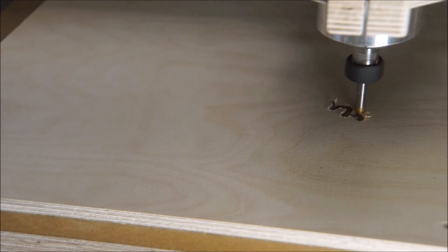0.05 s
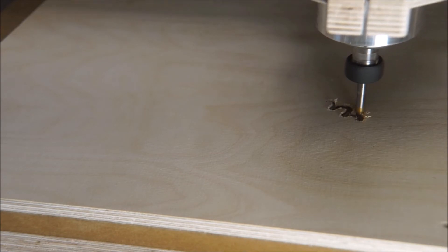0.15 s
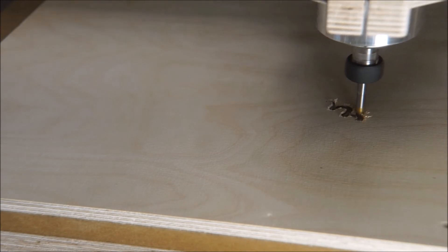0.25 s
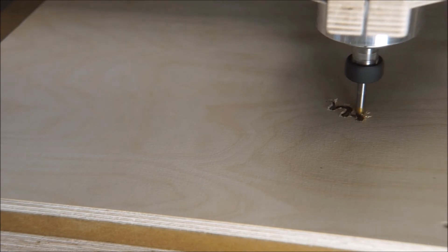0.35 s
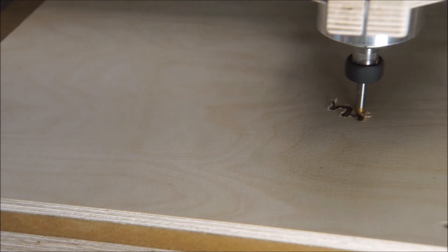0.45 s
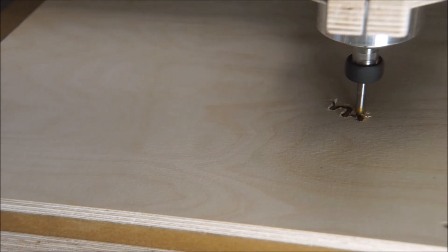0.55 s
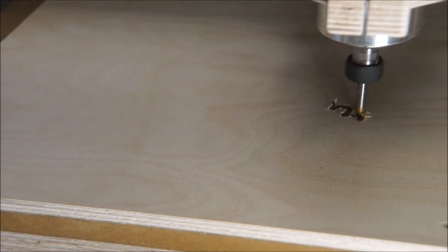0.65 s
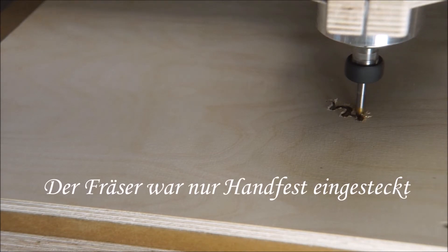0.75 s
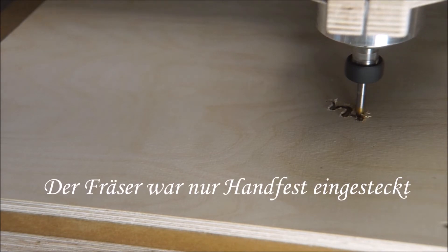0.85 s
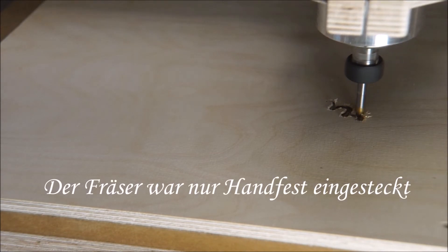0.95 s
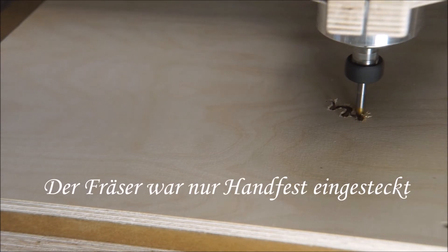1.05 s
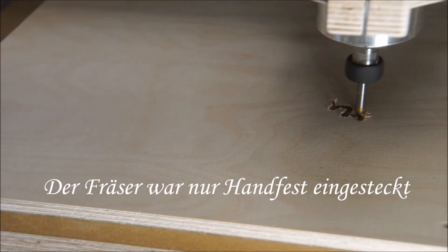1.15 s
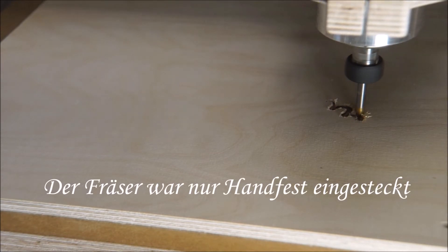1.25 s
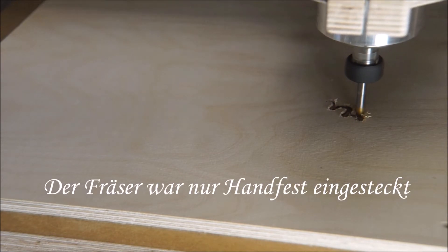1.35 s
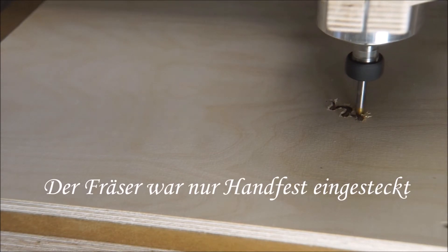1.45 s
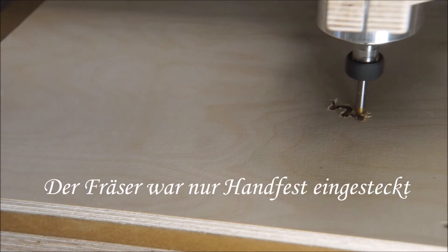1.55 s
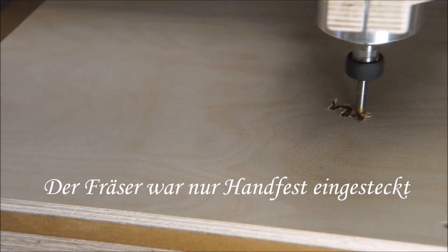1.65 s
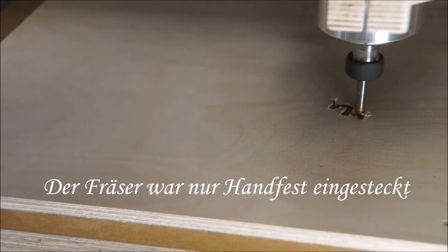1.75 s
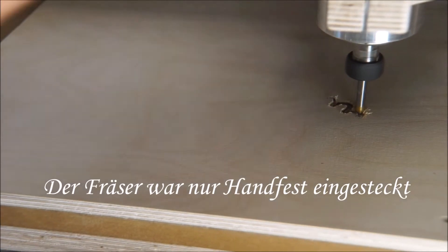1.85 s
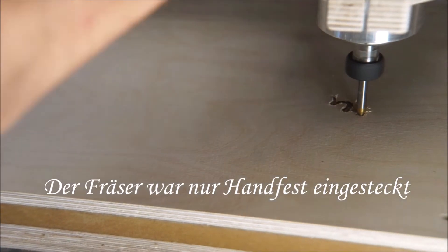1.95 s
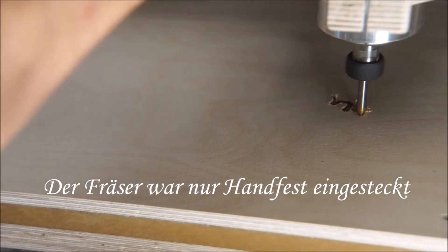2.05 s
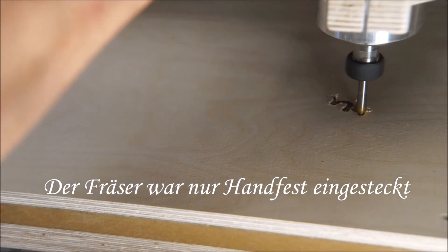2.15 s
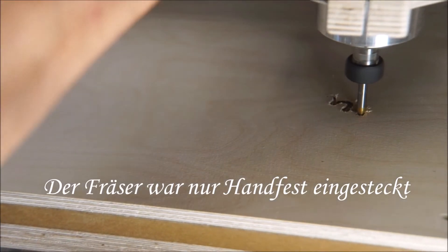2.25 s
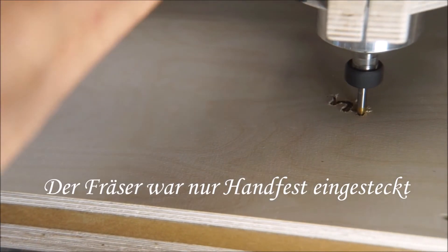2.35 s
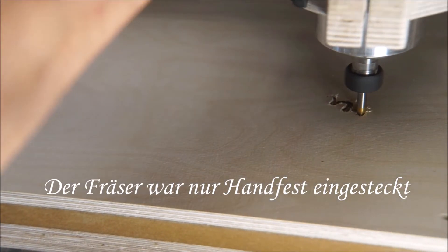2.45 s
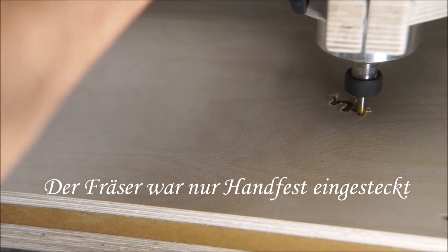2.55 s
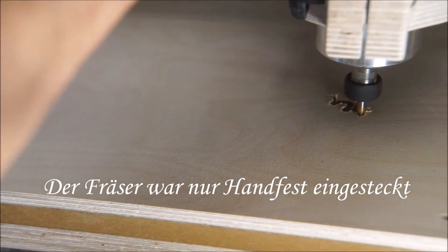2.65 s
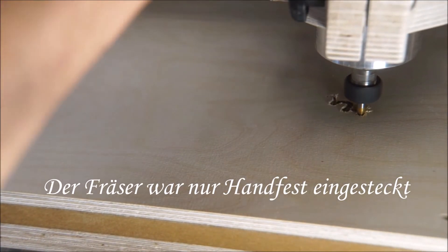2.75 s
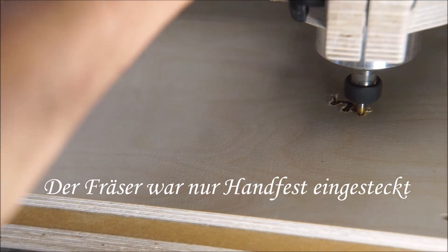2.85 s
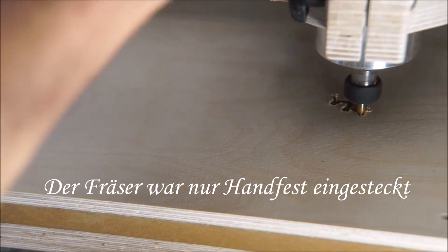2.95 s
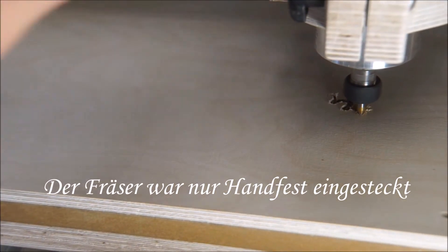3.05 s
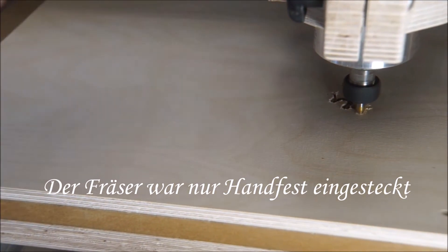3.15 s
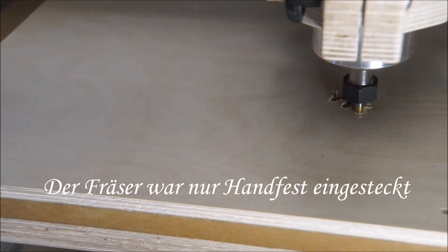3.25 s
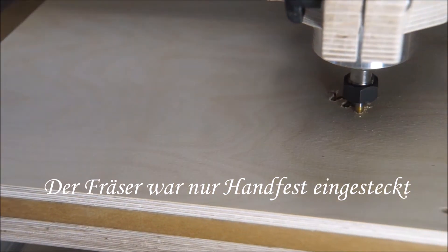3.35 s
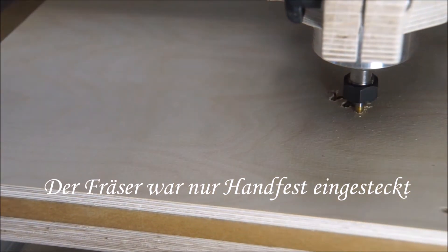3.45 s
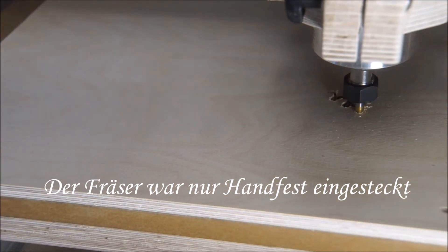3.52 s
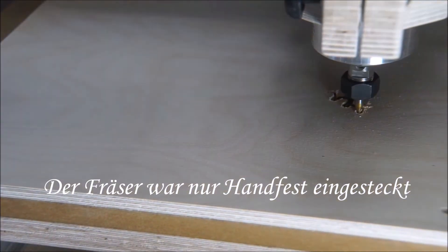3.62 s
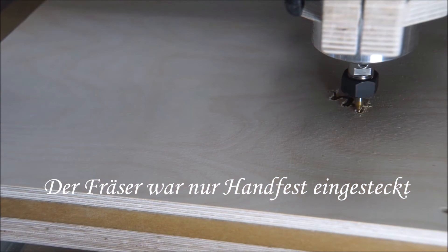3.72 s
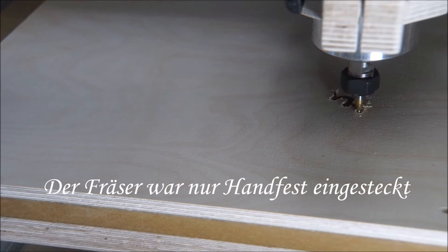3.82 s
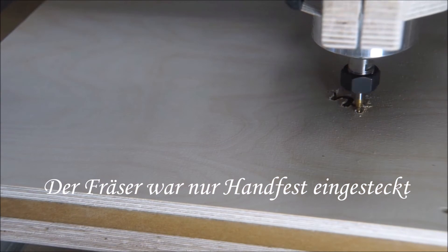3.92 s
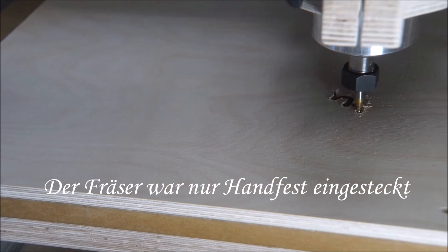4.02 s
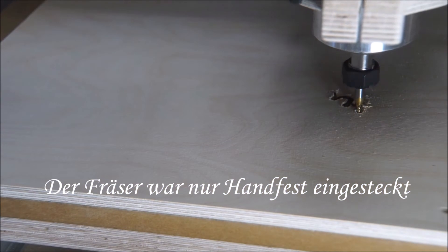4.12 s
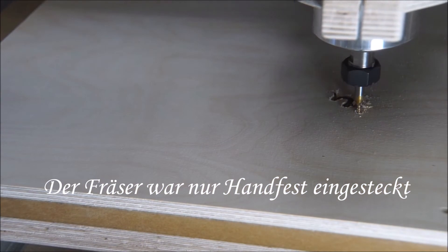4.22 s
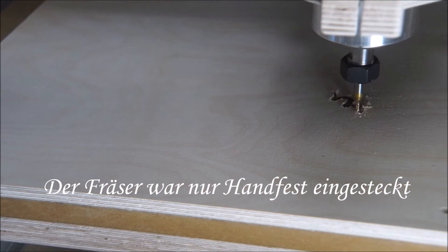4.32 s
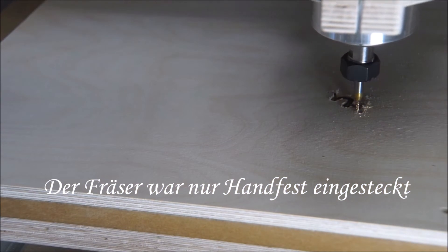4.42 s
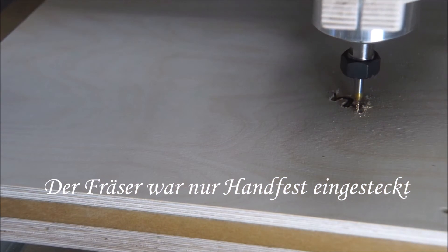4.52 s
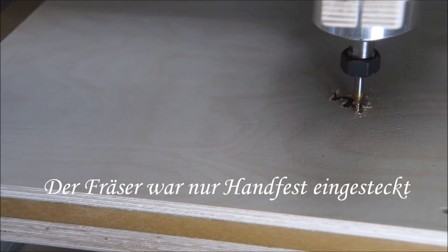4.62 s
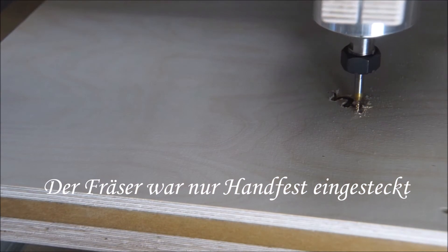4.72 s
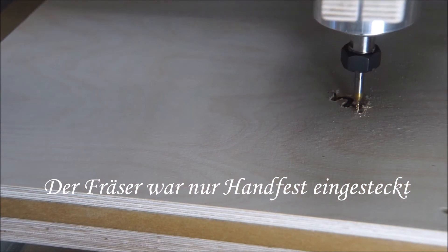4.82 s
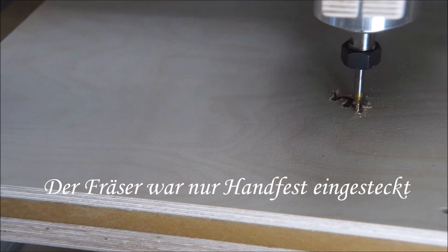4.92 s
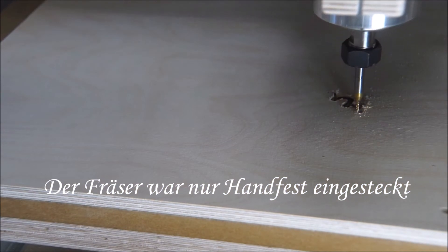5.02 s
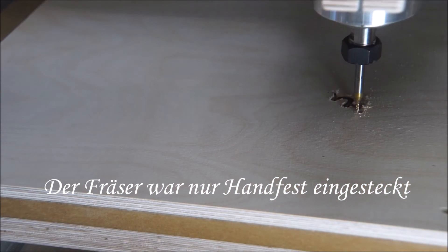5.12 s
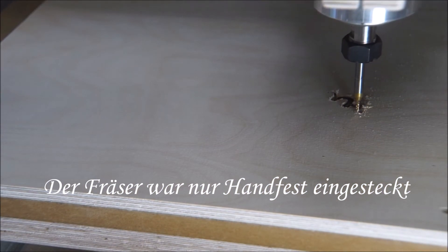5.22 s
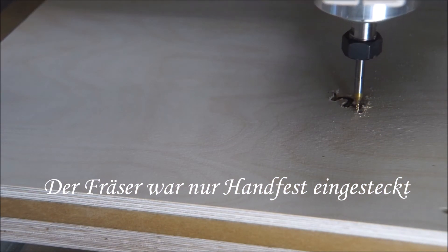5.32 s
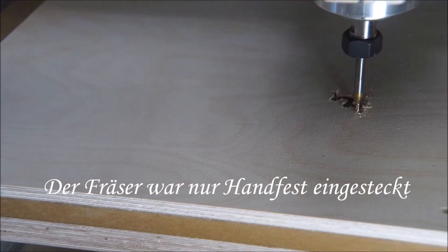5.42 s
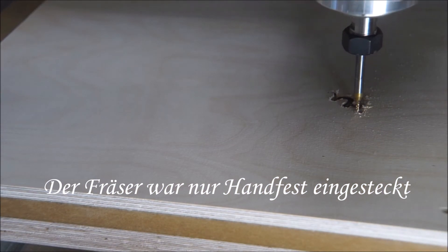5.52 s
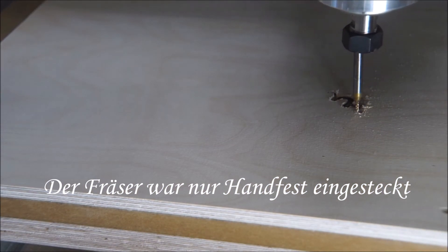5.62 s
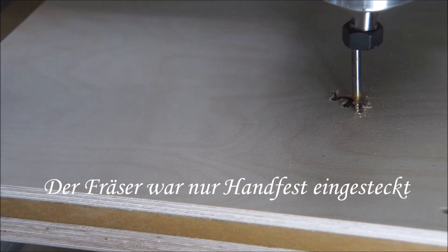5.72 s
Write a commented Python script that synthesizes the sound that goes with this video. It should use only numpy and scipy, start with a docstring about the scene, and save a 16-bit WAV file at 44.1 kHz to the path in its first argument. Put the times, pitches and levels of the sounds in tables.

```python
"""CNC router with a loose bit.

The bit squeals, chatters and rattles in the collet over the spindle's whine. The spindle coasts down,
is driven into a wooden board and stalls; the wood creaks and crunches under the push. A stepper motor
then lifts the head with a steady buzz, and the bit slips out of the collet."""
import sys
import numpy as np
from scipy import signal
from scipy.fft import rfft, irfft, next_fast_len
from scipy.io import wavfile

SR = 44100
rng = np.random.default_rng(int(sys.argv[2]) if len(sys.argv) > 2 else 0)


def waveform_to_disk(signal):
    """Save audio, clipped to [-1, 1], as 16-bit WAV at the path in sys.argv[1]."""
    frames = np.transpose(np.atleast_2d(signal))
    scaled = np.clip(frames, -1, 1) * 32767
    samples = np.round(scaled).astype(np.int16)
    wavfile.write(sys.argv[1], SR, samples)


N = 254445
T = np.arange(N) / SR

# pitches at which the falling whine swells, with dips between them: freq_hz, width_hz, gain_db
WHINE_PEAKS = [(948.3, 51.4, -27), (839.5, 30, -30.5), (753, 24, -40), (652, 58, -47), (552, 29, -39.5),
               (433, 78, -35.5)]
# whine overtones: whine_multiple, gain_db
WHINE_OVERTONES = [(2, 0), (3, -10), (4, -12), (5, -13), (8, -14.5), (12, -11.5)]
# partials of the bit binding in wood: whine_multiple, gain_db
GRIND_PARTIALS = [(2, -15), (3, -13), (4, -6), (5, -11), (6, -14), (7, -17), (8, -7.5), (9, -20), (10, -13),
                  (11, -16), (12, -9), (13, -15), (16, -12)]
# resonances of the bit pressed into the board: freq_hz, width_hz, gain_db
JAM_MODES = [(1562, 140, 9.5), (3240, 310, -5), (5530, 370, 6)]
# clean whirl partials: whirl_multiple, added_whine_multiple, gain_db
SQUEAL_PARTIALS = [(1, 0, -3), (1, 1, -4.5), (2, 0, 1), (3, 0, -7), (3, 1, -6.5), (4, 0, -2), (5, 0, -9.5),
                   (5, 1, -25), (6, 1, -16), (7, 0, -18)]
# steel-on-steel blow spectrum: freq_hz, gain_db
BLOW_SPECTRUM = [(150, -52.5), (300, -33), (480, -32), (560, -22), (700, -25.5), (900, -10), (1180, -13.5),
                 (1500, -8.5), (1800, -6), (2400, -2.5), (3000, -3), (3800, -7.5), (4600, -10), (6200, -8),
                 (7500, -23.5)]
# collet and spindle mount resonances: freq_hz, width_hz, gain_db
COLLET_MODES = [(1480, 27, 1.5), (2340, 84, -12), (2782, 46, 4), (2903, 45, 1.5), (3162, 27, 7),
                (3590, 29, -0.5), (5070, 180, -14), (6400, 180, -15)]
# scraping hiss spectrum: freq_hz, gain_db
HISS_SPECTRUM = [(4120, -7.5), (7000, -3), (7620, -4.5), (9200, -4), (9650, -7), (11700, -4), (15100, -11),
                 (15700, -11)]
# spells where the bit seats differently: start_s, end_s, blows_change_db, hiss_change_db
SEATINGS = [(0, 0.734, -3.5, 1), (1.245, 1.33, -2, -1), (1.345, 1.625, 1.1, 1.1), (1.658, 1.674, 3, 2),
            (1.68, 1.749, -4, -3), (1.757, 1.775, 2, -.5), (1.87, 2.043, -1.5, -0.1),
            (2.96, 3.02, -1.5, -3)]
# frame rumble spectrum: freq_hz, gain_db
SHUDDER_SPECTRUM = [(25, 3), (60, -4), (150, -0.5), (300, -7), (600, -22), (3000, -32)]
# course of the ragged whirl: time_s, pitch_hz, brightness_db_per_octave
CHATTER_COURSE = [(.27, 1015, -4.5), (.52, 1021, -0.5), (.76, 1013, -3.5), (1.13, 1051, -4.5),
                  (1.23, 967, -9), (1.36, 1005, -3), (1.49, 985, 1.5), (1.6, 926.5, -3), (1.68, 927, -10)]
# ragged whirl partials: whirl_multiple, gain_db
CHATTER_PARTIALS = [(2, -3), (3, 0), (4, -12), (5, -0.5), (6, -0.5), (7, -8), (8, -12), (9, -10)]
# bouts of ragged whirl: start_s, end_s, gain_db
BOUTS = [(.262, 1.24, -32.5), (1.34, 1.68, -36.5)]
# stick-slip creaks: start_s, length_s, pitch_hz, width_hz, level_db
SLIPS = [(3.145, .105, 1490, 30, -35), (3.185, .022, 920, 60, -32), (3.16, .07, 620, 160, -43),
         (3.29, .042, 1490, 40, -41), (3.312, .06, 960, 45, -34.5), (3.365, .06, 1010, 40, -43),
         (3.345, .07, 400, 40, -49), (3.43, .08, 565, 50, -45), (3.3, .13, 5850, 160, -56),
         (3.525, .03, 5840, 60, -50), (3.588, .025, 5800, 60, -57)]
# snapping fibre spectrum: freq_hz, gain_db
FIBRE_SPECTRUM = [(150, -57), (270, -18.5), (400, -18.5), (700, -4.5), (1200, -7.5), (2000, -7.5),
                  (2800, -7), (3400, -15), (5900, -20), (7600, -25.5), (14000, -35.5)]
# pushes of the bit into the board: start_s, end_s, level_db
BIT_PUSHES = [(3.24, 3.285, -50.5), (3.287, 3.399, -38.5), (3.415, 3.515, -39), (3.515, 3.643, -47.5),
              (3.648, 3.668, -47)]
# bit and frame knocks: start_s, level_db, centre_hz, width_hz, decay_s
CONTACTS = [(3.289, -45, 3040, 700, 0.015), (3.421, -34.5, 2400, 2200, 0.0033),
            (3.744, -35, 890, 1420, .008), (3.752, -39, 293, 221, 0.012), (4.226, -44, 2650, 990, 0.012),
            (4.229, -40.5, 1000, 1400, 0.0091)]
# steady stepper tones: step_multiple, level_db
STEADY_HARMONICS = [(2, -57.5), (14, -73), (20, -69.5), (25, -67.5), (28, -68.5), (29, -68.5), (30, -67.5),
                    (31, -60), (32, -62.5), (33, -65.5), (35, -69), (43, -78.5), (47, -74), (51, -64)]
# swelling stepper tones: step_multiple, early_db, late_db, change_s, swell_db, crest_s, pan_left_db
SWELLING_HARMONICS = [(4, -48.5, -55, 4.33, 0.5, 4.77, -6), (8, -61, -55, 5.36, 3, 5.44, -4),
                      (10, -83, -73, 4.55, 9, 4.68, 1), (12, -66, -55, 4.14, 3, 4.41, 7.5),
                      (16, -62.5, -57.5, 4.14, 1, 4.3, -1.5), (27, -56.5, -65, 4.19, 1, 4.4, -2)]
# slide rustle spectrum: freq_hz, gain_db
SLIDE_SPECTRUM = [(100, -20), (200, -8), (450, -11), (620, -4), (950, 3), (1400, -1.5), (2000, -7),
                  (2700, -9), (4000, -14.5), (6500, -15), (8000, -15), (10800, -12), (11300, -45)]
# shank drag spectrum: freq_hz, gain_db
DRAG_SPECTRUM = [(60, -32), (130, -4), (300, -3), (430, 7), (600, -7), (850, -4), (1900, -11.5),
                 (4500, -19), (6000, -30), (9000, -17), (10800, -17), (11300, -50)]
# stereo width: freq_hz, side_gain_db
SIDE_SPECTRUM = [(100, -10), (500, -18), (1000, -16.5), (2500, -9.5), (5000, -6), (9000, -3.5),
                 (14000, -2.5)]
# stereo balance: freq_hz, left_minus_right_db
BALANCE = [(100, 0.5), (600, -1.7), (1000, 0), (2200, -2.5), (4500, -1.3), (14000, -1.4)]

WHINE_HZ, OFF_S = 993, 2.113  # full-speed whine, two cycles a turn; power off
TOUCH_S, BITE_S, STALL_S = 3.043, 3.075, 3.255
STEP_HZ, LIFT_S = 210, 3.672


def undb(db):
    """Decibels to gain."""
    return 10 ** (np.asarray(db) / 20)


def unit(x):
    """Scale to rms 1."""
    return x / np.sqrt(np.mean(x ** 2))


def noise():
    """White noise."""
    return rng.standard_normal(N)


def walk(rate_hz):
    """Random wander, spread near 1."""
    knots = np.arange(int(T[-1] * rate_hz) + 2) / rate_hz
    return np.sqrt(3 / 2) * np.interp(T, knots, rng.standard_normal(len(knots)))


def gate(start_s, end_s, attack_s, release_s):
    """Linear attack, hold, exponential release."""
    return np.clip((T - start_s) / attack_s, 0, 1) * np.exp(-np.maximum(T - end_s, 0) / release_s)


def colour(x, spectrum):
    """Filter by a spectrum, falling 60 dB per octave beyond its ends."""
    hz, db = np.transpose(spectrum)
    size = next_fast_len(N, True)
    octave = np.log2(np.arange(size // 2 + 1) * SR / size + 1)
    beyond = np.maximum(np.log2(hz[0]) - octave, 0) + np.maximum(octave - np.log2(hz[-1]), 0)
    return irfft(rfft(x, size) * undb(np.interp(octave, np.log2(hz), db) - 60 * beyond), size)[:N]


def ring(x, hz, width_hz):
    """One resonance."""
    return signal.lfilter(*signal.iirpeak(hz, hz / width_hz, fs=SR), x)


def resonate(x, modes):
    """Resonances in parallel."""
    return sum(undb(db) * ring(x, hz, width_hz) for hz, width_hz, db in modes)


def turn(hz):
    """Running phase of a moving frequency."""
    return 2 * np.pi * np.cumsum(hz) / SR


def tone(phase, flicker_db, rate_hz):
    """Partial with wavering level, rms near 1."""
    return np.sqrt(2) * np.sin(phase + rng.uniform(0, 2 * np.pi)) * undb(flicker_db * walk(rate_hz))


def impacts(rate_hz, spread_db):
    """Random tiny blows of uneven size."""
    return unit((rng.random(N) < rate_hz / SR) * noise() * undb(spread_db * noise()))


def spindle_speed():
    """Share of full speed: steady, coasting ever more gently, then braked ever harder by the wood."""
    coast_s, bite_s = np.maximum(T - OFF_S, 0), np.maximum(T - BITE_S, 0)
    coast_loss_hz = 590 * coast_s - 68 * coast_s ** 2
    brake_loss_hz = 1250 * bite_s + 4900 * bite_s ** 2
    return np.maximum((WHINE_HZ - coast_loss_hz - brake_loss_hz) / WHINE_HZ, 0)


def spindle(phase, speed, jam):
    """Whine that swells and dips as it falls, its overtones, and a grind once the bit binds in wood."""
    drive = tone(phase, flicker_db=1.24, rate_hz=55) * np.minimum(speed / 0.5, 1) ** 2
    growth_db = 2 * np.minimum(T / 0.88 - 1, 0)  # bit works loose
    whine = undb(growth_db) * resonate(drive, WHINE_PEAKS)
    # a whirling bit damps the overtones, the low ones most
    damping_db = -7.5 * gate(0, BOUTS[-1][1], attack_s=0.0014, release_s=0.055)
    overtones = sum(undb(db + damping_db * 2 / k) * tone(round(k) * phase, flicker_db=3, rate_hz=23)
                    for k, db in WHINE_OVERTONES)
    juddering = phase + 0.15 * walk(400)
    grind = sum(undb(db) * tone(round(k) * juddering, flicker_db=2.5, rate_hz=90)
                for k, db in GRIND_PARTIALS)
    # the thin bit radiates little bass
    grind = signal.sosfilt(signal.butter(4, 450, "high", fs=SR, output="sos"), grind)
    grind = grind + resonate(grind, JAM_MODES)
    return whine + overtones * undb(-35) * speed ** 3.2 + grind * undb(-23.5) * jam * speed ** 0.79


def squeal(phase):
    """The shank rolls cleanly round the collet, beating with the spindle."""
    start_hz, sag_hz_per_s = 1359, 61.3
    roll = turn((start_hz - sag_hz_per_s * T) * (1 + 0.0056 * walk(307)))
    partials = sum(undb(db) * tone(round(k) * roll + round(m) * phase, flicker_db=1.5, rate_hz=77)
                   for k, m, db in SQUEAL_PARTIALS)
    return partials * undb(-30.5) * gate(0, 0.256, attack_s=0.0019, release_s=0.01)


def rattle(spurts, speed, jam):
    """Dense steel-on-steel blows ring the mount under a scraping hiss; both fade as the spindle slows."""
    blows = colour(impacts(rate_hz=14000, spread_db=-0.45), BLOW_SPECTRUM)
    blows = unit(blows + resonate(blows, COLLET_MODES))
    hiss = unit(colour(noise(), HISS_SPECTRUM))
    blows_db, hiss_db = -28.5 + 2.5 * jam, -33.5 + 9.5 * jam
    for start_s, end_s, blows_change_db, hiss_change_db in SEATINGS:
        spell = gate(start_s, end_s, attack_s=0.006, release_s=0.0033)
        blows_db += blows_change_db * spell
        hiss_db += hiss_change_db * spell
    # the mount rings on briefly after the stall
    drive = np.maximum(speed, 0.033 * gate(0, STALL_S, attack_s=0.01, release_s=0.0098))
    return spurts * (blows * undb(blows_db) * drive ** 0.59 + hiss * undb(hiss_db) * drive ** 1.12)


def shudder(speed, jam, lifting):
    """The frame rumbles at full speed, in the jam and during the lift."""
    shake = undb(-76) * speed ** 6.5 + undb(-82) * jam + undb(-81.5) * lifting + undb(-97)
    return shake * unit(colour(noise(), SHUDDER_SPECTRUM))


def chatter():
    """The shank's roll grows irregular until its upper partials smear into a rasp."""
    time_s, pitch_hz, brightness = np.transpose(CHATTER_COURSE)
    tilt_db_per_octave = np.interp(T, time_s, brightness)
    jitter = np.interp(T, [0.6, 1.15, 1.35], [0.014, 0.017, 0.045])
    roll = turn(np.interp(T, time_s, pitch_hz) * (1 + jitter * walk(1200) + 0.003 * walk(45.02)))
    partials = 0
    for k, db in CHATTER_PARTIALS:
        gain = undb(db + tilt_db_per_octave * max(np.log2(k / 3), 0))
        slip_rad = 0.63 * walk(260)
        partials += gain * tone(round(k) * roll + slip_rad, flicker_db=3, rate_hz=220)
    return partials * sum(undb(db) * gate(start_s, end_s, attack_s=0.01, release_s=0.0089)
                          for start_s, end_s, db in BOUTS)


def creaks():
    """Stick-slip of the bit sets single resonances creaking."""
    out = 0
    for start_s, length_s, pitch_hz, width_hz, db in SLIPS:
        progress = np.clip((T - start_s) / length_s, 0, 1)
        swell = np.sqrt(np.maximum(np.sin(np.pi * progress), 0))
        phase = turn(pitch_hz + 0.822 * width_hz * walk(400))
        out += undb(db) * swell * tone(phase, flicker_db=2.5, rate_hz=250)
    return out


def crunch():
    """Wood fibres snap under the stalled bit, push by push."""
    snaps = impacts(rate_hz=3100, spread_db=0) + 0.5 * noise()
    pushes = sum(undb(db) * gate(start_s, end_s, attack_s=0.0052, release_s=0.011)
                 for start_s, end_s, db in BIT_PUSHES)
    return unit(colour(snaps, FIBRE_SPECTRUM)) * pushes


def knocks():
    """Bit and frame knock: contact noise bursts through a damped resonance."""
    out = 0
    for start_s, db, hz, width_hz, decay_s in CONTACTS:
        burst = noise() * (T >= start_s) * np.exp(-np.abs(T - start_s) / decay_s)
        band_makeup = np.sqrt(2 * SR / (np.pi * width_hz))
        out += undb(db) * band_makeup * ring(ring(burst, hz, width_hz), hz, width_hz)
    return out


def stepper():
    """Step-rate harmonics ring the frame; some swell, each from its own direction. Stereo."""
    swell_period_s, crossfade_s = 0.231, 0.11
    phase = turn(STEP_HZ * (1 + 0.000214 * walk(29.9)))
    buzz = sum(undb(db) * tone(round(k) * phase, flicker_db=0.9, rate_hz=13)
               for k, db in STEADY_HARMONICS)
    for k, early_db, late_db, change_s, swell_db, crest_s, pan_left_db in SWELLING_HARMONICS:
        late = np.clip((T - change_s) / crossfade_s + 0.5, 0, 1)
        swell = np.cos(2 * np.pi * (T - crest_s) / swell_period_s)
        # the frame sings at harmonic 4 just before the shank comes free
        singing = (round(k) == 4) * gate(4.13, 4.28, attack_s=0.06, release_s=0.021)
        db = early_db + late * (late_db - early_db + swell_db * swell) + 6 * singing
        offset_db = (pan_left_db + 1.5 * singing) / 2
        gains = undb([db + offset_db, db - offset_db])
        buzz = buzz + gains * tone(round(k) * phase, flicker_db=2.2, rate_hz=25)
    step_ticks = sum(np.sin(k * phase) for k in range(3, 51))
    return buzz + undb(-86) * step_ticks


def slide():
    """The rising slide rustles and hums in the motor's resonance."""
    motor_hz, width_hz = 442, 46
    rustle = unit(colour(noise(), SLIDE_SPECTRUM)) * undb(-55.5 + 0.91 * walk(16.2))
    hum = unit(ring(ring(noise(), motor_hz, width_hz), motor_hz, width_hz))
    return rustle + undb(-71) * hum


def shank_drag():
    """The shank drags out of the collet, weakening as the grip shortens."""
    start_s, end_s, fade_db_per_s = 3.765, 4.28, 11.5
    grip = gate(start_s, end_s, attack_s=0.02, release_s=0.06)
    friction = unit(colour(impacts(rate_hz=1400, spread_db=-1), DRAG_SPECTRUM))
    level_db = -51.5 - fade_db_per_s * np.maximum(T - start_s, 0) + 3.1 * walk(38.4)
    return friction * grip * undb(level_db)


def spread(tones, mid_noise, side_noise):
    """Tones reach the two sides slightly out of phase; diffuse noise differs most in the treble."""
    quadrature = signal.hilbert(tones.mean(axis=0), next_fast_len(N))[:N].imag
    side = colour(side_noise + 0.68 * quadrature, SIDE_SPECTRUM)
    return tones + mid_noise + np.array([side, -side])


def off_centre(pair):
    """The machine stands slightly to one side; the balance varies with frequency."""
    hz, db = np.transpose(BALANCE)
    size = next_fast_len(N, True)
    balance_db = np.interp(np.arange(size // 2 + 1) * SR / size, hz, db)
    return irfft(rfft(pair, size) * undb([balance_db / 2, -balance_db / 2]), size)[:, :N]


def scene():
    """Run, coast, stall, lift. Stereo."""
    speed = spindle_speed()
    phase = turn(WHINE_HZ * speed * (1 + 0.00088 * walk(41.25) + 0.001516 * walk(4)))
    jam = gate(TOUCH_S, STALL_S, attack_s=0.01, release_s=0.03)
    lifting = np.clip((T - LIFT_S) / 0.0043, 0, 1)
    # blows come in spurts, bunched by the turning shaft
    spurts = undb(walk(350) + 0.5 * walk(45)) * (1 + 0.044 * np.cos(phase / 2))
    tones = spindle(phase, speed, jam) + squeal(phase) + chatter() + creaks() + knocks()
    tones = tones + lifting * stepper()
    mid_noise, side_noise = [
        rattle(spurts, speed, jam) + crunch() + lifting * (slide() + shank_drag())
        + shudder(speed, jam, lifting) for _ in range(2)]
    return off_centre(spread(tones, mid_noise, side_noise))


def record(dry):
    """Steep low-pass."""
    cutoff_hz = 15750
    return signal.sosfilt(signal.ellip(10, 0.1, 80, cutoff_hz, fs=SR, output="sos"), dry)


dry = scene()
out = record(dry)
waveform_to_disk(out)
```